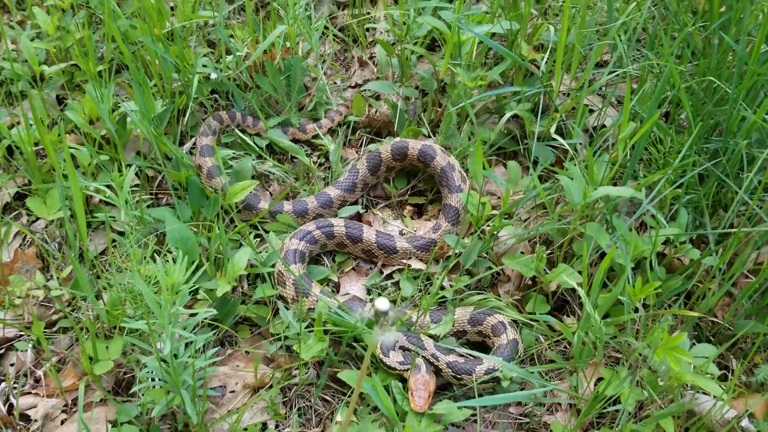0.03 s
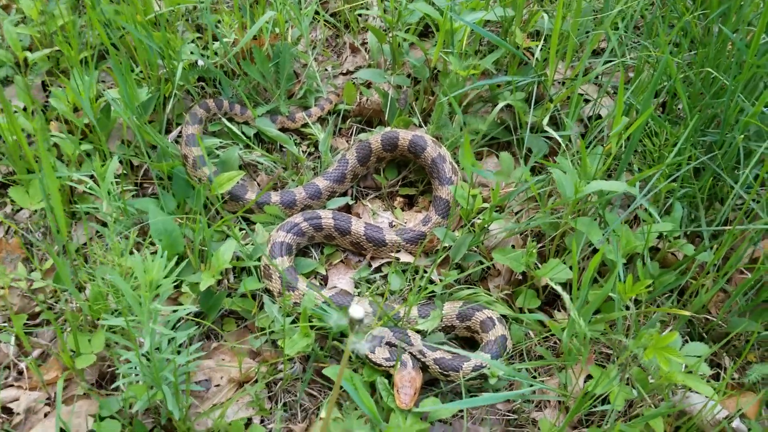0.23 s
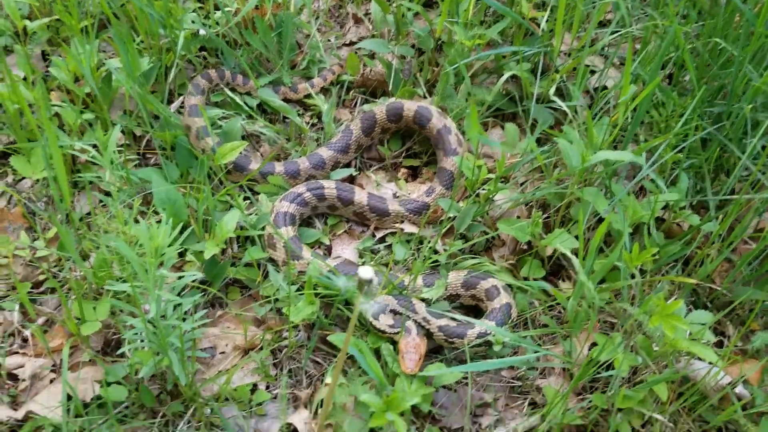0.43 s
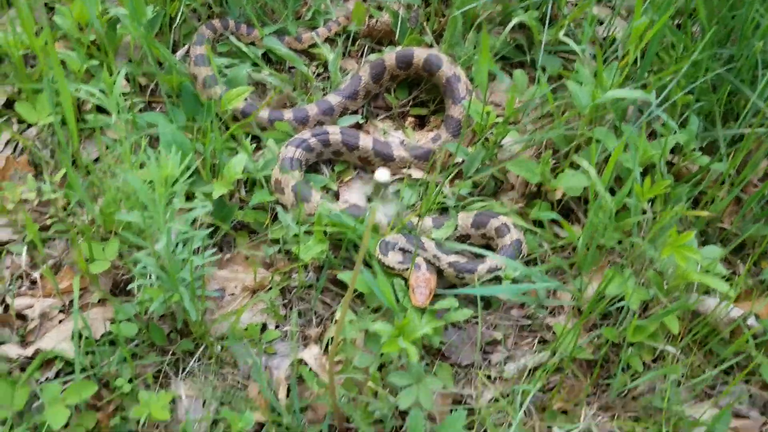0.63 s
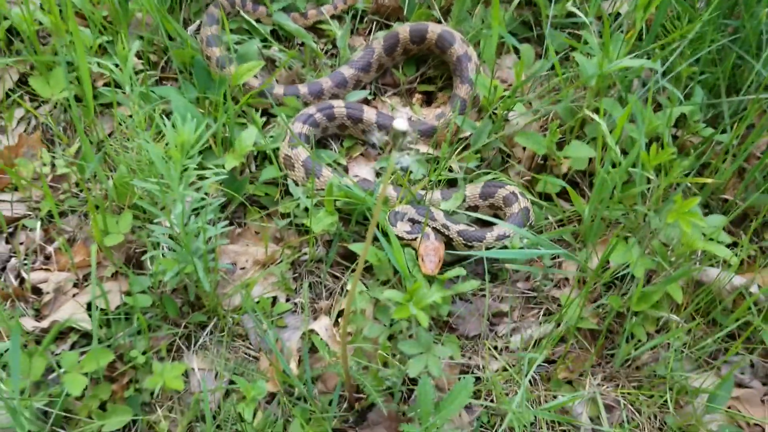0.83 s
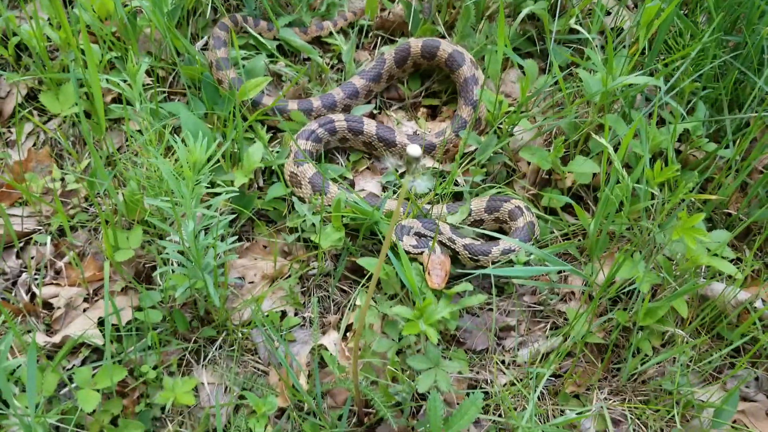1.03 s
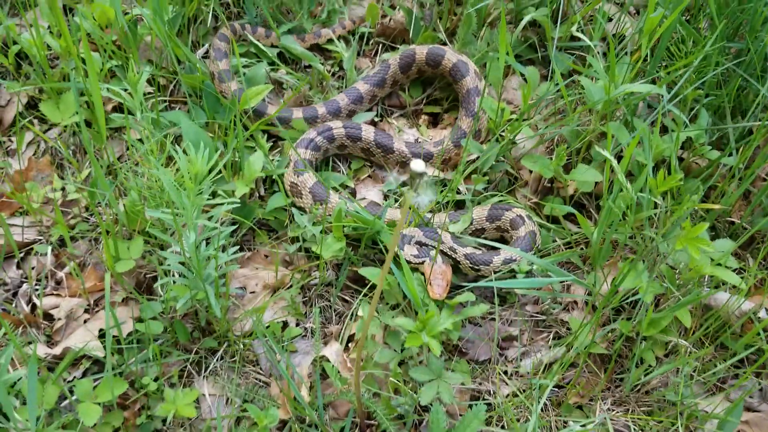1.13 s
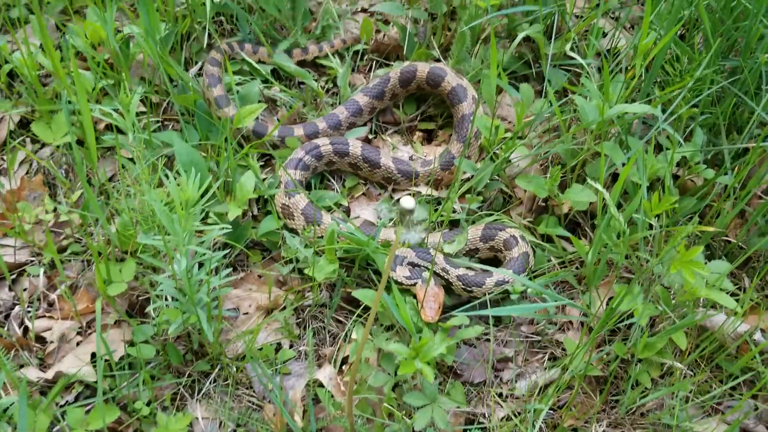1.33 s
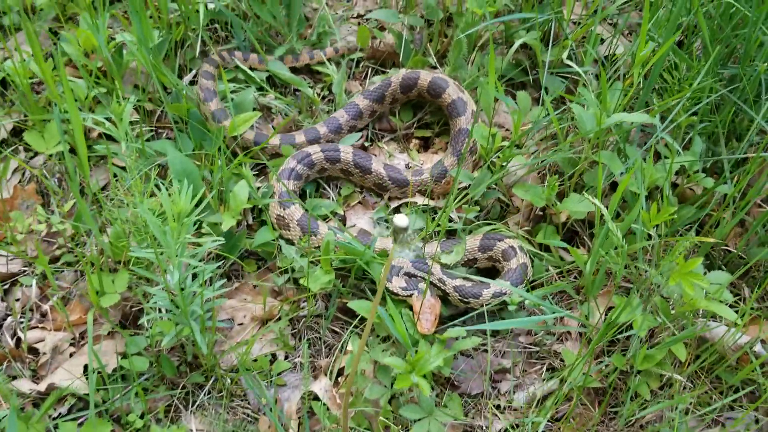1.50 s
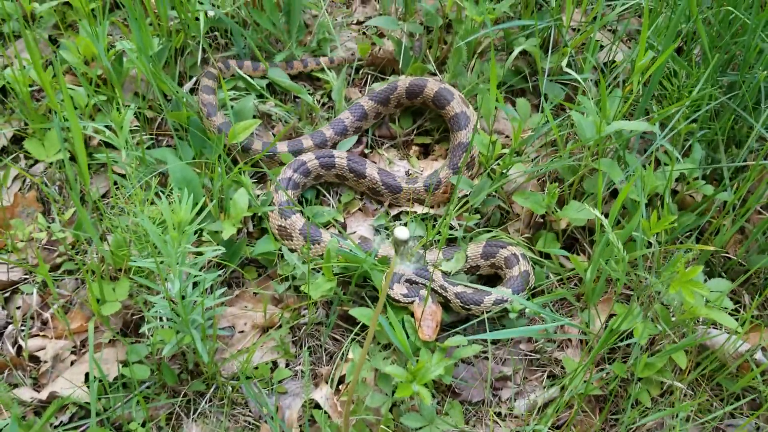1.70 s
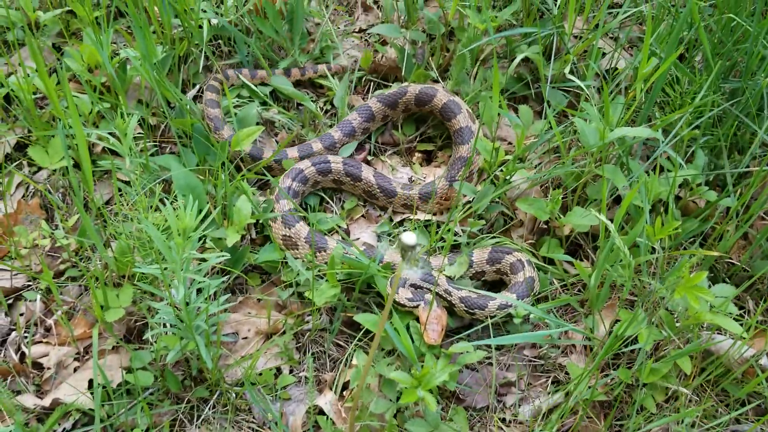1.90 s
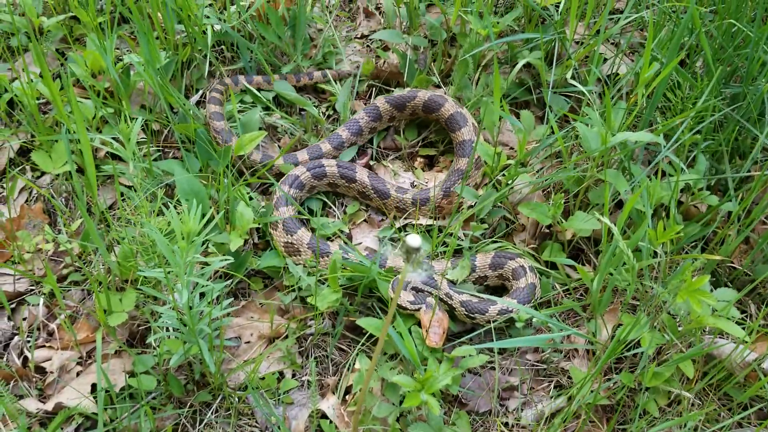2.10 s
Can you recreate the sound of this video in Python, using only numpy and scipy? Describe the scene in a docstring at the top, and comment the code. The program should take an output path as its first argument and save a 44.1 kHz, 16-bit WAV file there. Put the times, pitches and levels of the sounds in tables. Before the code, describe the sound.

A snake's tail vibrates in dry leaves close by, a fast, crackly buzz. From about 0.2 to 0.5 seconds a louder swish passes through grass, with a dull knock and sharp stem snaps. The buzz continues with bright ticks and a short leaf crunch at 0.8 seconds, is strongest from 1 to 1.7, then dies down. Faint low rumble, distant motor hum and hiss lie underneath.

```python
"""Something swishes through the grass close by, with a dull knock and a few sharp snaps of dry stems.
A snake shakes its tail in dry leaves, about 42 strokes a second, and carries on after the swish has gone.
Each stroke sets off a spray of tiny crackles; the tail also patters on packed litter, ticks against one
thin leaf and drags a leaf into ringing. One dry leaf is crushed.
A low rumble, the hum of a far motor and a faint hiss lie under it all."""
import sys
import numpy as np
from scipy import signal
from scipy.fft import rfft, irfft, next_fast_len
from scipy.io import wavfile
from scipy.ndimage import uniform_filter1d

SR = 44100
rng = np.random.default_rng(int(sys.argv[2]) if len(sys.argv) > 2 else 0)


def wav_record(signal):
    """Record a signal, one row per channel, as 16-bit PCM in the file named by sys.argv[1]."""
    frames = np.transpose(np.atleast_2d(signal))
    bounded = np.clip(frames, -1, 1)
    # unit amplitude maps onto the largest positive 16-bit level
    quanta = np.round(bounded * 32767).astype(np.int16)
    wavfile.write(sys.argv[1], SR, quanta)


N = 94815
T = np.arange(N) / SR
FFT_SIZE = next_fast_len(N + SR // 8, True)
HZ = np.maximum(np.arange(FFT_SIZE // 2 + 1) * SR / FFT_SIZE, 1)
CUTOFF_HZ = 15850


# speed of the shake: time_s, strokes_per_s
SHAKE_RATE = [(0.55, 41.0), (0.72, 42.0), (0.88, 44.6), (1.03, 42.2), (1.15, 40.9), (1.35, 43.4),
              (1.65, 41.9)]
# light rubbing between strokes, relative to a stroke: time_s, level_db
RUB_LEVEL = [(0.1, -1), (0.55, 17), (0.7, -3.5), (0.9, 3), (1.07, -14), (1.2, -10), (1.42, -7.5),
             (1.62, -11), (1.7, 2)]
def strokes():
    """Each swing of the tail hits the leaves hard going out and softly coming back; rms near 1."""
    stroke_at_s, return_s, return_db, spread_db = 1.066, .0097, -5.5, .9
    rate, = in_time(SHAKE_RATE)
    swings = np.cumsum(rate) / SR
    swings -= np.interp(stroke_at_s, T, swings)
    age = swings % 1 / rate
    number = (np.floor(swings) - np.floor(swings[0])).astype(int)
    out_db, back_db = spread_db * rng.standard_normal((number[-1] + 1, 2))[number].T
    outward = from_db(out_db) * burst(age, attack_s=.0005, hold_s=.0035, decay_s=.0042)
    inward = burst(age - return_s, attack_s=.0005, hold_s=.002, decay_s=.003)
    inward *= from_db(return_db + 2 * back_db)
    power = outward ** 2 + inward ** 2 + from_db(in_time(RUB_LEVEL)[0]) ** 2
    return np.sqrt(power / uniform_filter1d(power, size=4200))


# stereo image of the tail: freq_hz, side_minus_mid_db, left_minus_right_db
TAIL_STEREO = [(295, -20, 14), (920, -6, 5), (1770, -11.5, 12), (3520, -0.5, -2.5), (4750, -4.5, 4.5),
               (8600, 1.5, 0.5), (11000, 1.5, -1.5), (12400, -1.5, 1), (15000, 2, 2)]
def tail_noise():
    """Raw noise for everything the tail touches, placed in the stereo field."""
    return stereo_noise(*in_pitch(TAIL_STEREO))


# vigour of the tail in the loose leaves: time_s, level_db
LEAF_LEVEL = [(0, -66.5), (0.13, -77), (0.3, -54.5), (0.56, -52), (0.68, -55), (0.9, -55), (1.02, -49.5),
              (1.08, -46.5), (1.15, -48), (1.27, -55), (1.36, -55), (1.44, -50.5), (1.49, -54), (1.56, -52),
              (1.655, -52), (1.72, -61.5), (1.79, -65), (2.15, -64)]
# strokes that land squarely on a leaf: start_s, level_db
SQUARE_HITS = [(0.9955, -57), (1.0435, -60), (1.0668, -46), (1.1185, -45), (1.1437, -46), (1.3885, -43),
               (1.4608, -44), (1.4945, -53), (1.5072, -44.5), (1.5538, -46), (1.5880, -51), (1.6345, -49),
               (1.8398, -55)]
# crisp tone of the leaves: freq_hz, relative_db
LEAF_EQ = [(300, -42), (1000, -8.5), (1800, -5.5), (2350, -10), (2650, 0), (3100, 6.5), (4050, 0),
           (4900, 6.5), (5700, 7), (6400, 4.5), (7000, -2), (7700, 6.5), (8500, 4), (9400, -7),
           (10200, 0.5), (11400, -3.5), (13000, 2), (15500, 0)]
def loose_leaves(beat):
    """Every stroke sets off a spray of tiny fractures in the dry leaves."""
    grains = crackle(per_s=970, spread_db=1.5, decay_s=.0007, smooth=.58)
    spray = beat * from_db(in_time(LEAF_LEVEL)[0]) * grains
    envelope = np.hypot(spray, taps(SQUARE_HITS, hold_s=.0018, decay_s=.0022))
    return colour(shifting_leaves(envelope * tail_noise()), in_pitch(LEAF_EQ)[0])


def shifting_leaves(x, spread_db=2.0, changes_per_s=63):
    """Different leaves are touched from moment to moment, so each half-octave swells on its own."""
    centres = np.arange(10, 14.1, .5)  # octaves above 1 Hz: about 1 to 16 kHz
    moments = np.arange(0, 3, 1 / changes_per_s)
    spectrum, shifted = rfft(x, FFT_SIZE), 0
    for weight in np.eye(len(centres)):
        band = irfft(spectrum * np.interp(np.log2(HZ), centres, weight), FFT_SIZE)[:, :N]
        swell_db = spread_db * np.interp(T, moments, rng.standard_normal(len(moments)))
        shifted += band * from_db(swell_db)
    return shifted


# weight of the tail on the litter: time_s, level_db
LITTER_LEVEL = [(0, -83), (0.5, -60.5), (0.72, -69), (1.0, -63.5), (1.16, -62), (1.3, -70.5), (1.37, -66.5),
                (1.45, -56), (1.49, -65), (1.56, -58.5), (1.65, -63.5), (1.78, -80), (2.15, -103)]
# dull tone of the litter: freq_hz, relative_db
LITTER_EQ = [(100, -12.5), (300, -10.5), (600, -4), (900, -4.5), (1450, 1.5), (1950, 1), (2400, -19.5),
             (6000, -28.5)]
def litter_patter(beat):
    """Strokes that reach the packed litter beneath the leaves make a dull patter."""
    grains = crackle(per_s=540, spread_db=2.5, decay_s=.0029, smooth=.29)
    envelope = beat * from_db(in_time(LITTER_LEVEL)[0]) * grains
    return colour(envelope * tail_noise(), in_pitch(LITTER_EQ)[0])


# bright ticking: time_s, level_db
TICK_LEVEL = [(0, -66), (0.5, -60), (0.6, -54), (0.72, -59), (1.0, -62), (1.12, -80), (1.3, -67),
              (1.8, -85)]
# hard flicks of the tail: start_s, level_db
HARD_FLICKS = [(0.6745, -46), (0.6975, -43), (0.7135, -43), (0.7208, -39)]
def thin_leaf(beat):
    """The tail ticks against one thin leaf, which has a single high resonance."""
    grains = crackle(per_s=300, spread_db=2.4, decay_s=.0015, smooth=.08)
    ticks = beat * from_db(in_time(TICK_LEVEL)[0]) * grains
    envelope = np.hypot(ticks, taps(HARD_FLICKS, hold_s=.00062, decay_s=.00074))
    return colour(envelope * tail_noise(), resonance_db(hz=12650, width_hz=750))


# drags along a leaf: start_s, hold_s, level_db
DRAGS = [(0.584, 0.19, -63), (1.296, 0.085, -57)]
# resonances of that leaf: pitch_hz, width_hz, relative_db
LEAF_MODES = [(3100, 380, -3), (5450, 240, -0.5)]
def leaf_drag():
    """The tail drags along a leaf; the soft rubbing keeps two resonances ringing."""
    level = sum(from_db(db) * burst(T - start_s, hold_s, decay_s=.028, attack_s=.0095)
                for start_s, hold_s, db in DRAGS)
    grains = crackle(per_s=750, spread_db=-3.0, decay_s=.002, smooth=.22)
    power = sum(from_db(db + resonance_db(hz, width_hz)) ** 2 for hz, width_hz, db in LEAF_MODES)
    return colour(level * grains * tail_noise(), 10 * np.log10(power))


# brittle tone of the crunch: freq_hz, relative_db
CRUNCH_EQ = [(300, -29), (1000, -10), (1700, 0.5), (3200, 1), (5500, 1), (9000, -8), (11000, -0.5),
             (13500, 7), (16000, 5)]
def leaf_crush(start_s=.8048, level_db=-43):
    """A dry leaf gives way in a short, dense crunch."""
    level = from_db(level_db) * burst(T - start_s, hold_s=.013, decay_s=.009)
    grains = crackle(per_s=1500, spread_db=1.5, decay_s=.0007, smooth=.3)
    return colour(level * grains * tail_noise(), in_pitch(CRUNCH_EQ)[0])


# tone of the grass ahead of the band faders: freq_hz, relative_db
GRASS_EQ = [(88, -45), (150, -11), (361, -9), (675, -12), (905, -8), (998, -6.5), (1210, -0.5), (1830, -3),
            (3700, -3.5), (5250, -1.5), (6390, -8.5), (7180, -2), (9440, -6.5), (14200, 3.5), (16000, -2.5)]
# stereo image of the grass and the snaps: freq_hz, side_minus_mid_db, left_minus_right_db
GRASS_STEREO = [(300, -11, 3), (690, -18, 3.5), (1640, -3.5, -0.5), (2890, 4.5, 7), (5040, 3.5, -0.5),
                (8100, 0.5, 4.5), (10300, 1, -1), (13000, 0, -9), (15100, -9, 17)]
# band faders of the swish: time_s, low_db, mid_db, treble_db
GRASS_LEVELS = [(0, -79, -65.5, -63.5), (0.14, -88, -63.5, -62.5), (0.2, -83, -53, -54),
                (0.251, -59, -47, -46.5), (0.3, -59, -52.5, -47), (0.325, -52, -47, -43.5),
                (0.354, -50.5, -42.5, -34.5), (0.396, -50, -48, -39.5), (0.445, -49.5, -39.5, -35.5),
                (0.477, -48.5, -39.5, -35), (0.505, -53, -44, -42.5), (0.531, -60.5, -59, -55),
                (0.6, -72.5, -60, -74), (0.699, -84, -78.5, -94)]
def grass_brush(crossovers_hz=(1625, 4260)):
    """Something brushes through close grass: a grainy swish that swells twice."""
    grains = crackle(per_s=1500, spread_db=2.0, decay_s=.001, smooth=.3)
    swish = colour(grains * stereo_noise(*in_pitch(GRASS_STEREO)), in_pitch(GRASS_EQ)[0])
    low, body = (signal.sosfiltfilt(signal.butter(4, hz, fs=SR, output="sos"), swish)
                 for hz in crossovers_hz)
    bands = low, body - low, swish - body
    return sum(from_db(db) * band / band.mean(axis=0).std()
               for db, band in zip(in_time(GRASS_LEVELS), bands))


# breaking stems and leaves: start_s, level_db, hold_s, treble_tilt_db_per_octave
STEM_SNAPS = [(0.1028, -50, 0.0023, -6), (0.25, -44, 0.0022, -3), (0.3117, -30.5, 0.002, -2),
              (0.4483, -31, .0004, -7), (0.4763, -22.5, 0.0005, 4), (0.5200, -41.5, .001, -12),
              (0.8035, -36.5, 0.0007, 1.5), (1.4368, -43, .0035, 1), (1.9552, -48.5, 0.0008, -.5)]
# tone of a snap before its tilt: freq_hz, relative_db
SNAP_EQ = [(60, -50), (300, -22), (1200, -9), (2200, -6), (3300, 0), (4500, -6), (5500, -2), (9500, -7),
           (13500, 0), (16000, -3)]
def snaps(tilt_from_hz=1000):
    """Dry stems and leaves break in single cracks, a few milliseconds long at most."""
    noise = stereo_noise(*in_pitch(GRASS_STEREO))
    tone_db, = in_pitch(SNAP_EQ)
    octaves = np.log2(np.maximum(HZ / tilt_from_hz, 1))
    cracks = 0
    for start_s, db, hold_s, tilt in STEM_SNAPS:
        envelope = from_db(db) * burst(T - start_s, hold_s, decay_s=.0005)
        cracks += colour(envelope * noise, tone_db + tilt * octaves)
    return cracks


def knock(peak_s=.3123, pitch_hz=396, width_s=.001, gain_db=-34.5, low_cut_hz=140):
    """One dull, heavily damped knock on the left."""
    age = T - peak_s
    pulse = np.cos(2 * np.pi * pitch_hz * age) * np.exp(-.5 * (age / width_s) ** 2)
    low_cut = signal.butter(4, low_cut_hz, "high", fs=SR, output="sos")
    return pan(left_db=22) * from_db(gain_db) * signal.sosfilt(low_cut, pulse + 1e-18)


# tone of the outdoor bed: freq_hz, relative_db
BED_EQ = [(20, -14.5), (40, -7), (58, -7.5), (75, 0.5), (105, -3.5), (160, -8.5), (230, -17.5),
          (500, -25.5), (1100, -28.5), (1750, -26), (2350, -33), (3100, -42.5), (5400, -31), (9500, -31),
          (13500, -23.5), (16000, -27)]
# width of the bed: freq_hz, side_minus_mid_db
BED_WIDTH = [(25, -3), (60, -28), (120, -10.5), (300, -6.5), (2000, 3.5), (10000, 1)]
BED_LEFT_DB = 3.5
def outdoors(gain_db=-62.5):
    """Far rumble and faint hiss, leaning left."""
    noise = stereo_noise(in_pitch(BED_WIDTH)[0], BED_LEFT_DB)
    return from_db(gain_db) * colour(noise, in_pitch(BED_EQ)[0])


# notes of the motor: pitch_hz, level_db
MOTOR_NOTES = [(91, -73.5), (117, -72)]
def far_motor(width_hz=4.5):
    """A far motor hums in the rumble: two narrow, wavering bands of noise."""
    hum = 0
    for hz, db in MOTOR_NOTES:
        peak_db = -20 * np.log10(1 + ((HZ - hz) / width_hz) ** 2)
        hum += from_db(db) * colour(rng.standard_normal(N), peak_db)
    return pan(BED_LEFT_DB) * hum


def crackle(per_s, spread_db, decay_s, smooth):
    """Envelope of many tiny fractures of uneven size over a smooth share of friction; rms 1."""
    sizes = from_db(spread_db * np.minimum(rng.exponential(1, N), 4))
    clicks = (rng.random(N) < per_s / SR) * sizes ** 2
    power = signal.lfilter([1], [1, -np.exp(-2 / (decay_s * SR))], clicks + 1e-18)
    return np.sqrt(smooth + (1 - smooth) * power / power.mean())


def burst(age, hold_s, decay_s, attack_s=.0001):
    """Linear attack, hold, exponential release."""
    return np.clip(age / attack_s, 0, 1) * np.exp(-np.maximum(age - attack_s - hold_s, 0) / decay_s)


def taps(rows, hold_s, decay_s):
    """Envelope of single sharp contacts."""
    return sum(from_db(db) * burst(T - start_s, hold_s, decay_s) for start_s, db in rows)


def resonance_db(hz, width_hz):
    """EQ curve of one resonance, 0 dB on top."""
    return -10 * np.log10(1 + ((HZ / hz - hz / HZ) * hz / width_hz) ** 2)


def colour(x, curve_db):
    """Minimum-phase EQ, scaled so that white noise keeps its level."""
    gain = from_db(curve_db)
    gain /= np.sqrt(np.mean(gain ** 2 * (HZ < CUTOFF_HZ)))
    cepstrum = irfft(np.log(gain), FFT_SIZE)
    cepstrum[1:FFT_SIZE // 2] *= 2  # folded forward, so ringing only follows a hit
    cepstrum[FFT_SIZE // 2 + 1:] = 0
    return irfft(rfft(x, FFT_SIZE) * np.exp(rfft(cepstrum)), FFT_SIZE)[..., :N]


def stereo_noise(side_db, left_db):
    """Broadband noise with a given width and balance at each frequency."""
    mid, side = rfft(rng.standard_normal((2, FFT_SIZE)))
    channels = mid + side * from_db(side_db) * [[1], [-1]]
    return irfft(channels * pan(left_db), FFT_SIZE)[:, :N]


def pan(left_db):
    """Gains of the left and right channel."""
    gains = from_db(np.array([[.5], [-.5]]) * left_db)
    return gains / gains.mean(axis=0)


def from_db(db):
    """Decibels to gain."""
    return 10 ** (np.asarray(db) / 20)


def in_time(rows):
    """The columns of a table at every sample."""
    time_s, *columns = np.transpose(rows)
    return [np.interp(T, time_s, column) for column in columns]


def in_pitch(rows):
    """The columns of a table at every frequency."""
    hz, *columns = np.transpose(rows)
    return [np.interp(np.log(HZ), np.log(hz), column) for column in columns]


def scene():
    """The open-air mix; one beat drives the leaves, the litter and the thin leaf."""
    beat = strokes()
    tail = loose_leaves(beat) + litter_patter(beat) + thin_leaf(beat) + leaf_drag()
    return tail + leaf_crush() + grass_brush() + snaps() + knock() + outdoors() + far_motor()


def record(dry):
    """A steep high cut on the whole mix."""
    return signal.sosfilt(signal.ellip(12, .1, 80, CUTOFF_HZ, fs=SR, output="sos"), dry)


dry = scene()
out = record(dry)
wav_record(out)
```